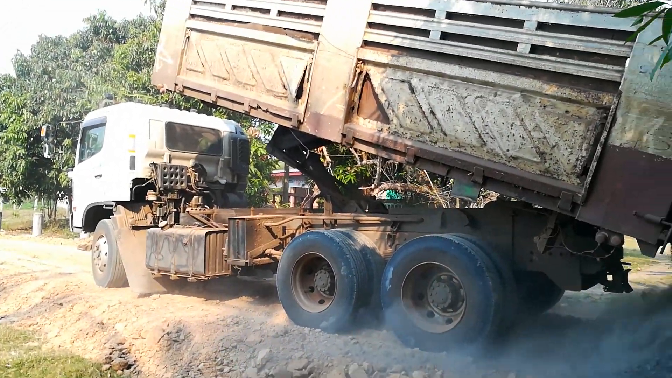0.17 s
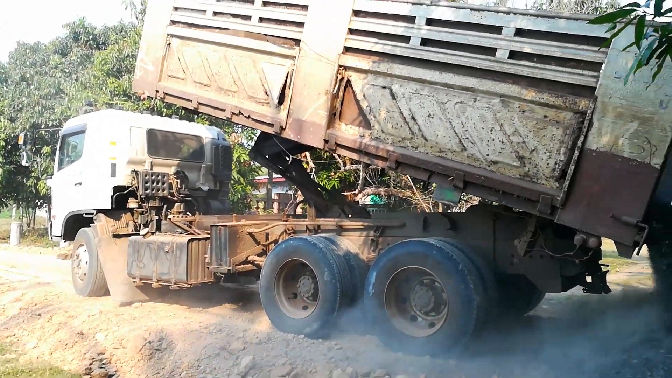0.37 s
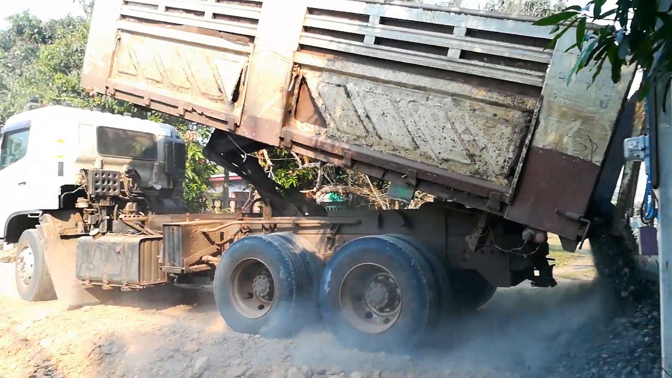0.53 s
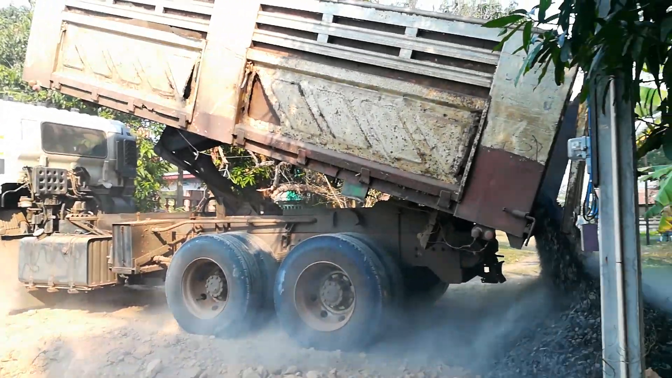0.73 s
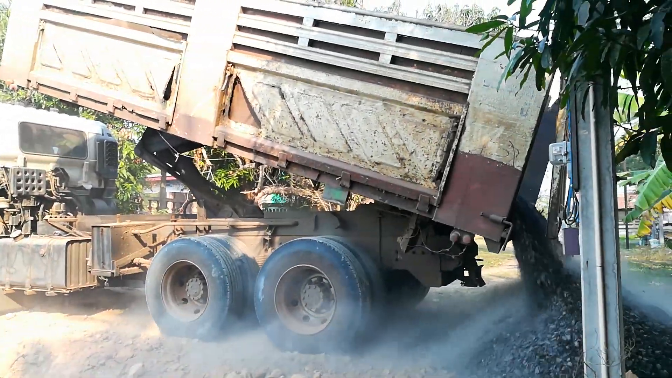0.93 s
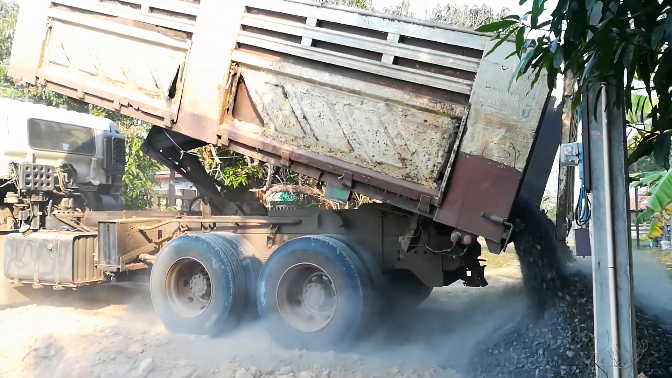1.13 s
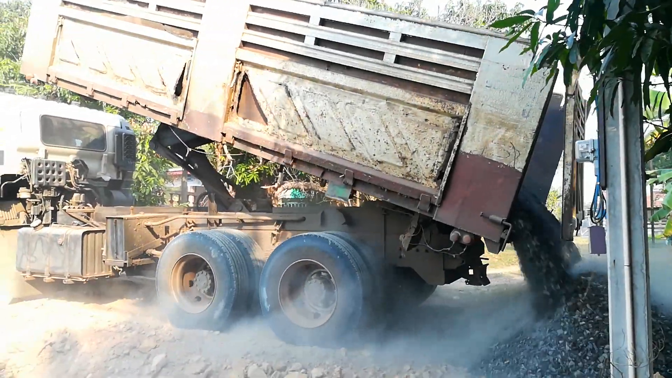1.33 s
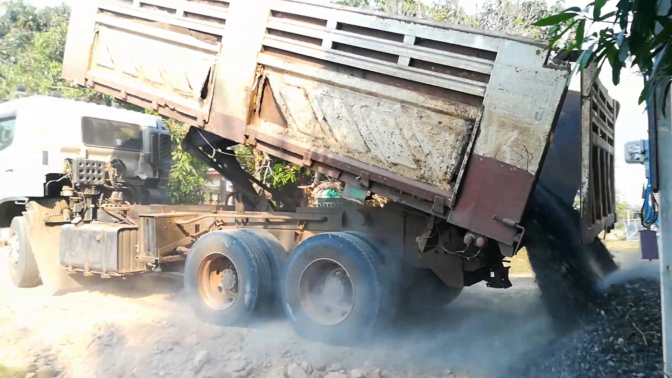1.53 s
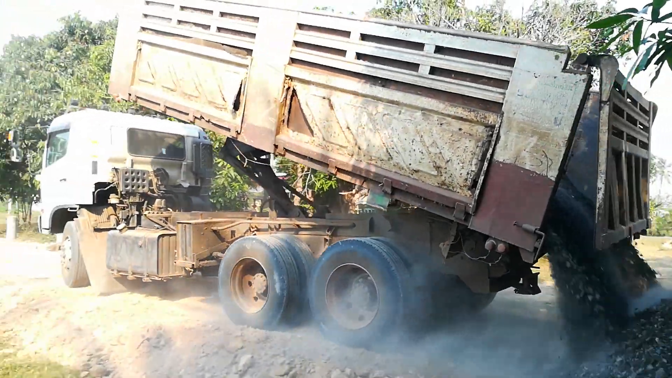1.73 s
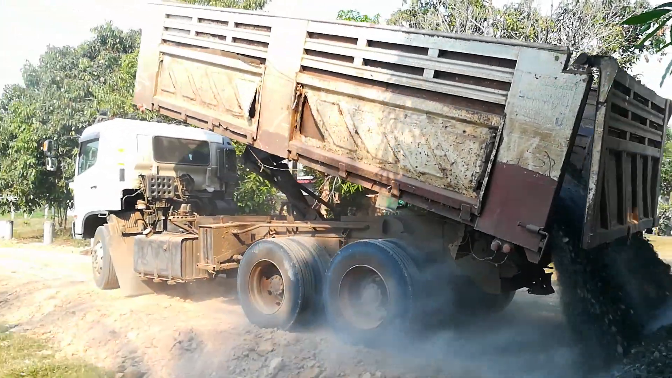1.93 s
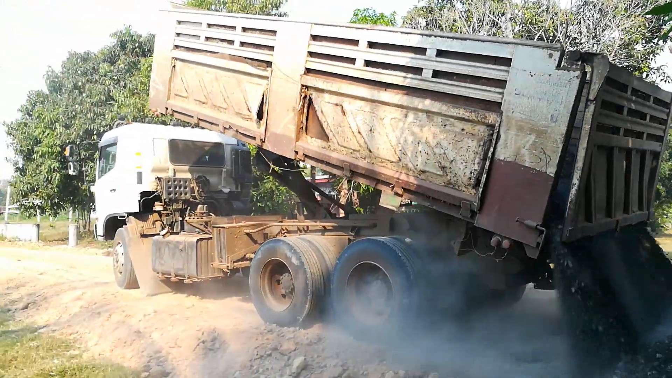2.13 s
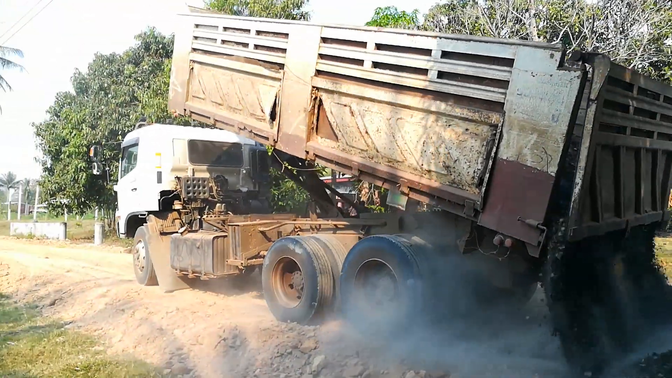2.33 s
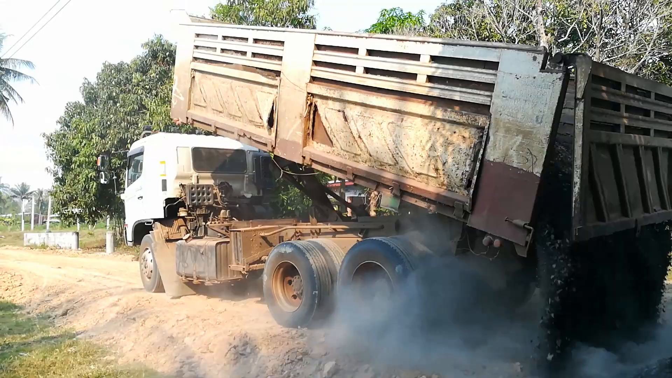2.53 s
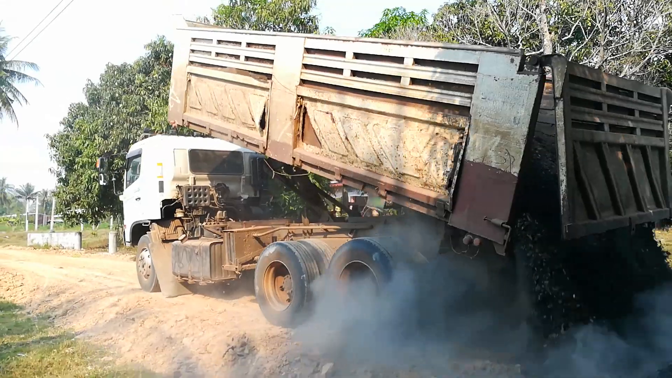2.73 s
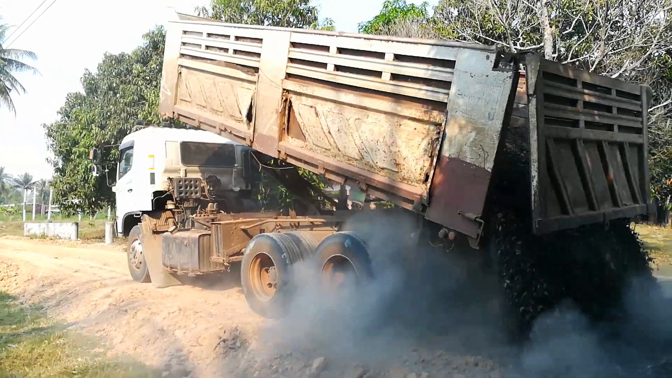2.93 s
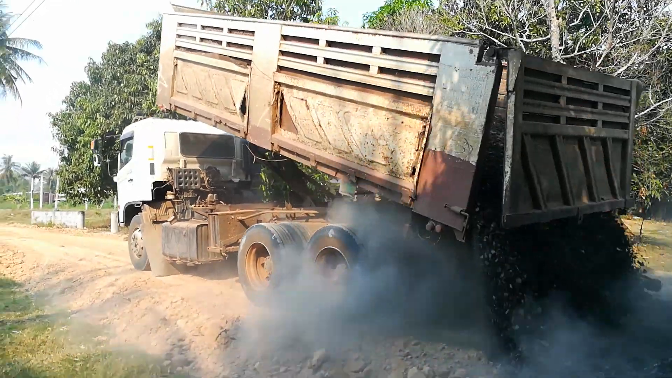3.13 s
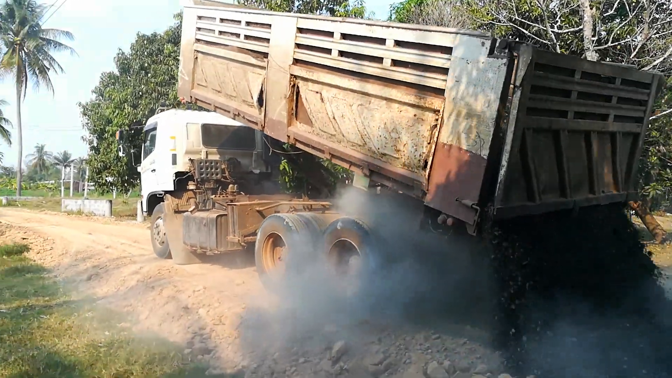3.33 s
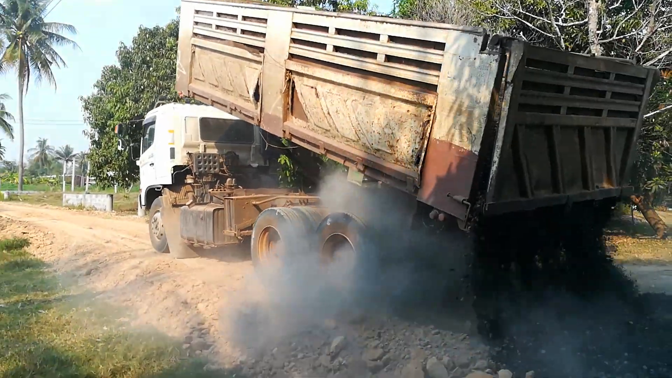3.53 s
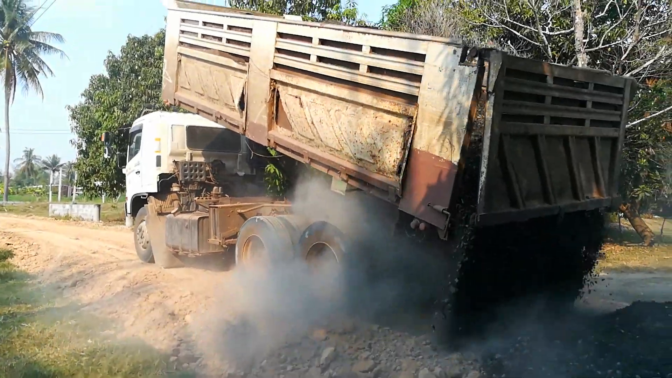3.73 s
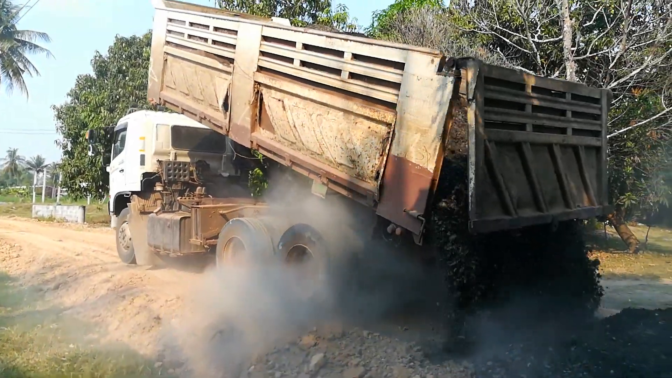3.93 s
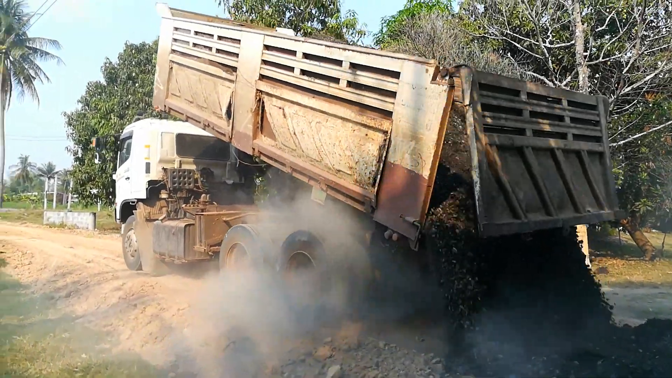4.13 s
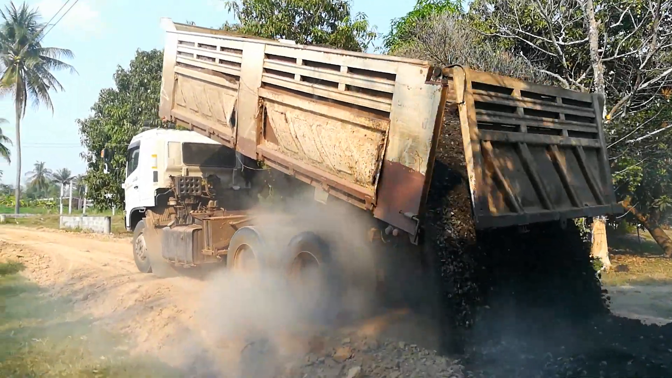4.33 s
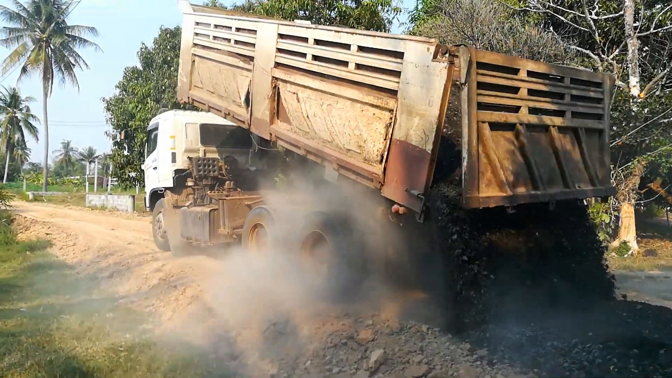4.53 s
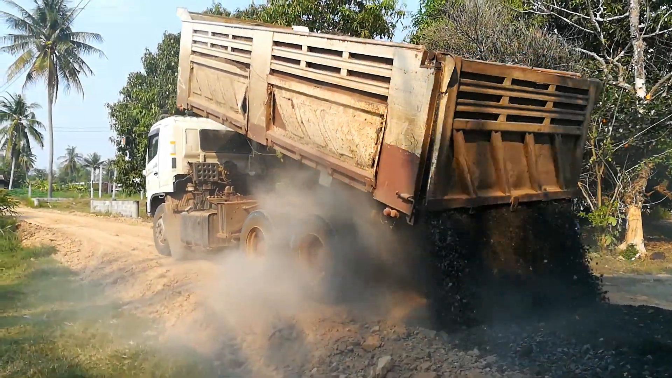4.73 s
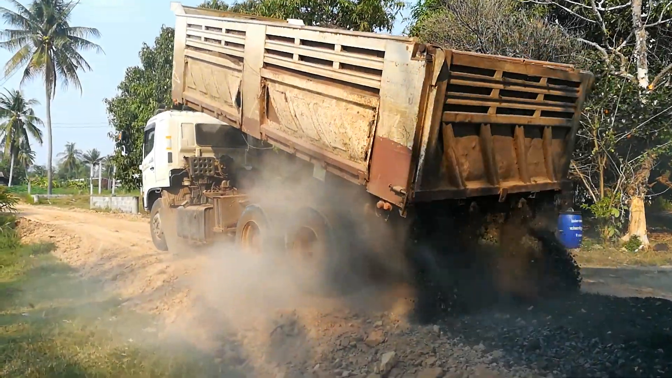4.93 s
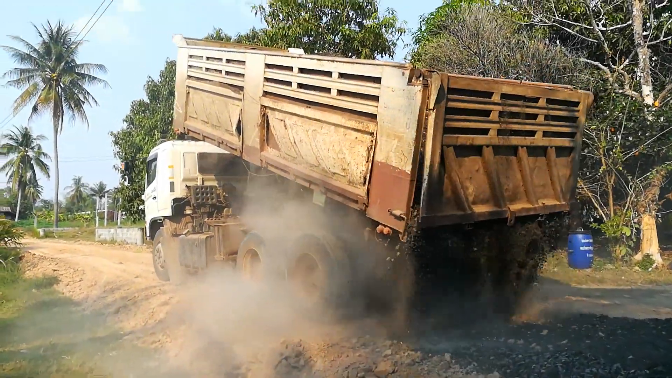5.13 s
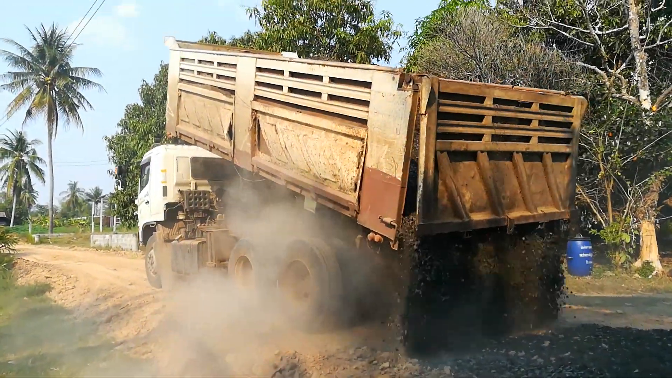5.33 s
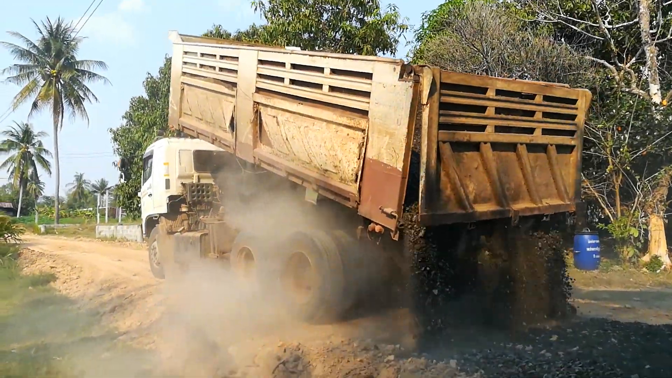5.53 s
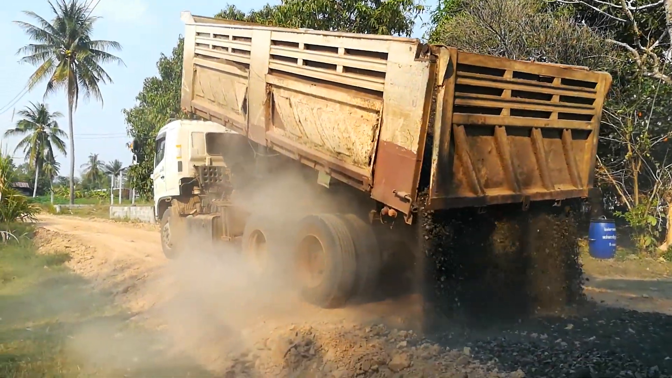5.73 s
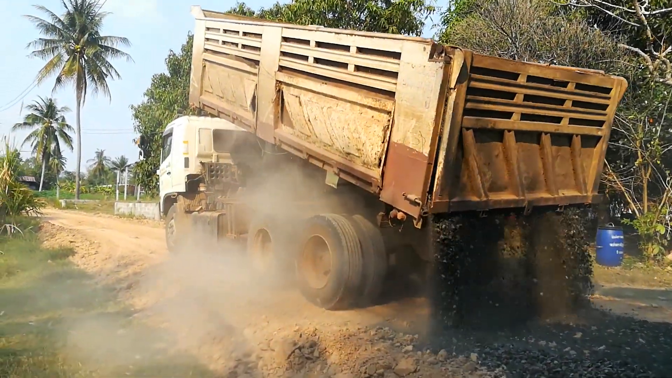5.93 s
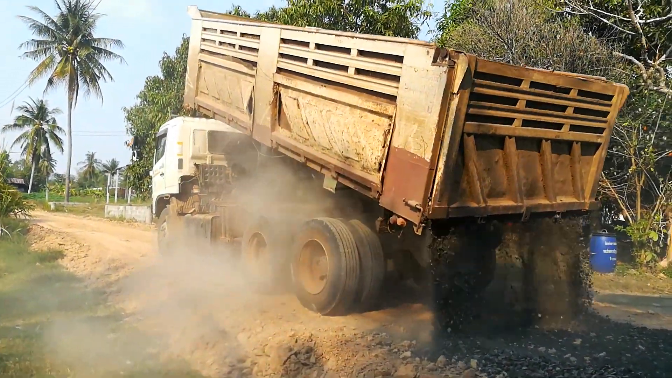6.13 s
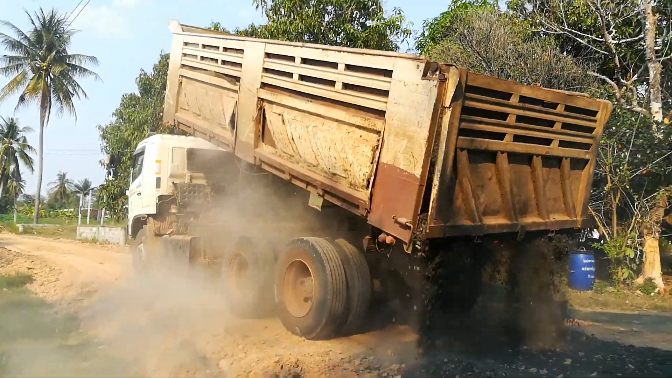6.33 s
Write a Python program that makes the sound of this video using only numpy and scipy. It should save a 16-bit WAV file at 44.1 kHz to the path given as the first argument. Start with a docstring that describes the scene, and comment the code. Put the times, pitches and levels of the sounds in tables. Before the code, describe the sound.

Outdoors, gravel hisses from a tipping truck while its diesel throbs low, rising and falling. After a brief high hinge squeal, coarse rock comes down in crunching rushes that rattle the steel bed and rumble on the ground. The loudest rush makes the bed boom. A last surge follows, with sharp stone strikes and small pings. The pouring spreads wide in stereo, with the engine in the middle.

```python
"""Coarse rock slides down a dump truck's tipped steel bed in five big surges and smaller slips. Its many small
collisions crunch and rattle the panels and it rumbles on the ground. Fine gravel hisses out under the tailgate,
single stones strike the metal and the tailgate clangs once. Behind it the diesel revs up and down, hard chips
ping, the tailgate hinge squeals once, and the tailgate swings shut with a low boom that sets the bed ringing."""
import sys
import numpy as np
from scipy import signal
from scipy.fft import rfft, irfft, next_fast_len
from scipy.io import wavfile
from scipy.ndimage import map_coordinates

SR = 44100
rng = np.random.default_rng(int(sys.argv[2]) if len(sys.argv) > 2 else 0)


def store_wav(level_fs):
    """Save 16-bit WAV to argv[1]."""
    pcm = np.round(np.clip(np.atleast_2d(level_fs), -1, 1) * 32767)
    wavfile.write(sys.argv[1], SR, pcm.T.astype(np.int16))


N = 286209
BAND_LIMIT_HZ = 15900

# rock surges: (full flow at [s], rise [s], hold [s], fall [dB/s], crunch [dB], rattle [dB], rumble [dB])
ROCK_SURGES = [(.34, .22, .19, 87, -33, -43.5, -54), (1.2, 0.66, 1, 30, -48, -50.5, -51),
               (2.08, 0.11, 0.028, 130, -25.5, -37.5, -51), (2.24, 0.051, 0.012, 69, -32.5, -41, -53),
               (2.435, .015, .005, 172, -34, -40.5, -51), (3.25, .075, 0.019, 112, -25, -32.5, -45),
               (3.463, .04, 0.0092, 64, -38, -40.5, -54), (3.745, 0.22, 0.38, 63, -57, -51, -53),
               (4.19, 0.031, .01, 200, -49, -57, -56), (4.53, 0.042, 0.024, 60, -44.5, -49, -44),
               (4.717, 0.072, 0.036, 187, -18.5, -20.5, -28.5), (4.949, .1, 0.035, 78, -36.5, -38, -41),
               (5.171, .015, 0.0052, 189, -35.5, -43, -54), (5.396, 0.22, 0.27, 36, -50, -49.5, -52.5),
               (5.915, .12, 0.071, 45, -27.5, -32, -49.5), (6.18, 0.082, 0.0095, 59, -36.5, -44.5, -52)]
# stone on stone: (frequency [Hz], level [dB])
CRUNCH_SPECTRUM = [(500, -26.5), (1500, -7.5), (2400, -4.5), (3400, 2), (5500, -0.5), (7500, -4.5),
                   (9500, -10), (12000, -19), (16000, -40)]
# stone on steel: (frequency [Hz], level [dB])
RATTLE_SPECTRUM = [(300, -27), (550, -10.5), (800, -1), (1100, -5), (1600, -1), (2050, 0.5), (2500, -6),
                   (4000, -21)]
# left-right likeness of direct sound: (frequency [Hz], coherence [0..1])
DIRECT_COHERENCE = [(60, 1), (250, 0.95), (700, 0.33), (1400, 0.96), (2500, 0.29), (5000, 0.11),
                    (15000, 0.083)]
def rock_slide():
    """Rock comes down in clumps, knocking and chinking; the bed rattles just after and fades slower."""
    sliding = flow([(*shape, db) for *shape, db, _, _ in ROCK_SURGES])
    shaking = flow([(*shape, db) for *shape, _, db, _ in ROCK_SURGES], lag_s=0.01, fall_scale=0.72)
    clumps = wobble(70)
    knocks = collisions(count=70000, scatter_db=8, decay_s=.0002, samples=40)
    chinks = collisions(count=4500, scatter_db=9, decay_s=.005, samples=560)
    crunch = wall_reflections(knocks + amp(-7.5) * chinks, t60_s=0.1, wet_db=-4)
    crunch = stereo(crunch, CRUNCH_SPECTRUM, DIRECT_COHERENCE)
    drumming = collisions(count=80000, scatter_db=8, decay_s=.00012, samples=24)
    drumming = wall_reflections(drumming, t60_s=0.18, wet_db=-6.5)
    rattle = steel_panels(stereo(drumming, RATTLE_SPECTRUM, DIRECT_COHERENCE), direct_db=-4.5)
    return sliding * amp(0.5 + 1.25 * clumps) * crunch + shaking * amp(0.17 + clumps) * rattle


def flow(pours, lag_s=0, fall_scale=1):
    """Gain of overlapping pours: each swells 15 dB over its rise time, holds, then drains."""
    t = np.arange(N) / SR - lag_s
    power = np.zeros(N)
    for full_s, rise_s, hold_s, fall_db_per_s, db in pours:
        swell_db = 15 * (np.maximum(full_s - t, 0) / rise_s) ** 2
        drain_db = fall_scale * fall_db_per_s * np.maximum(t - full_s - hold_s, 0)
        power += amp(db - np.minimum(swell_db + drain_db, 100)) ** 2
    return np.sqrt(power)


def collisions(count, scatter_db, decay_s, samples):
    """Two streams of tiny impacts, each a damped ring of random pitch and strength."""
    t = np.arange(samples, dtype=np.float32) / SR
    when, pitch, strength, stream = rng.random((count, 4)).T
    phase = np.outer(np.float32(2 * np.pi * BAND_LIMIT_HZ * pitch), t)
    rings = np.float32(amp(scatter_db * strength))[:, None] * np.sin(phase) * np.exp(-t / decay_s)
    start = (when * (N - samples)).astype(int) + N * (stream > .5)
    index = start[:, None] + np.arange(samples)
    return unit_rms(np.bincount(index.ravel(), rings.ravel(), 2 * N).reshape(2, N))


def wall_reflections(pair, t60_s, wet_db):
    """Dense echoes between the steel walls blur collisions into a rush."""
    t = np.arange(SR // 8) / SR
    tail = rng.standard_normal((2, len(t))) * amp(-60 * t / t60_s)
    echoes = unit_rms(signal.fftconvolve(pair, tail, axes=1)[:, :N])
    return unit_rms(pair + amp(wet_db) * echoes)


# bed panel resonances: (centre [Hz], width [Hz], gain [dB])
PANEL_MODES = [(907, 23, -5), (1012, 31, -2.5), (1108, 88, 6.5), (1220, 66, -1.5), (1352, 42, -2.5),
               (1523, 78, 1.5), (1934, 84, -9)]
def steel_panels(blows, direct_db):
    """Blows heard directly and through the bed's ringing panels."""
    def resonance(hz):
        return sum(amp(db) * 1j * hz * width_hz / (centre_hz ** 2 - hz ** 2 + 1j * hz * width_hz)
                   for centre_hz, width_hz, db in PANEL_MODES)
    return unit_rms(filtered(blows, lambda hz: amp(direct_db) + resonance(hz)))


# low rumble of ground and exhaust: (frequency [Hz], level [dB])
RUMBLE_SPECTRUM = [(20, -14), (60, 3), (120, 1), (190, -2.5), (240, -1), (330, 0), (450, -8.5),
                   (900, -20.5)]
def ground_rumble():
    """Each surge lands a moment later, over the steady stream hitting the ground."""
    landing = flow([(*shape, db) for *shape, _, _, db in ROCK_SURGES], lag_s=0.019, fall_scale=0.46)
    steady_db = -58.5
    return np.hypot(landing, amp(steady_db)) * stereo_noise(RUMBLE_SPECTRUM, DIRECT_COHERENCE)


# tailgate swinging shut: (time [s], relative level [dB], hardness [dB/octave re 150 Hz])
TAILGATE_BLOWS = [(4.744, -31.5, 8.5), (4.759, -28.5, -3)]
# whole-bed modes: (frequency [Hz], relative level [dB], t60 [s])
BED_MODES = [(68.7, -7, 1.0), (98, -5, 1), (115.5, -8.5, 2.3), (159, -14, .3), (224, 3, 0.24),
             (291, -17, 0.74), (340, -9, 0.16), (366, -11, 0.46), (534, -9, 0.17)]
def bed_boom():
    """The tailgate swings shut and sets the whole bed ringing in its low modes."""
    out = np.zeros(N)
    for start_s, blow_db, db_per_octave in TAILGATE_BLOWS:
        t = np.maximum(np.arange(N) / SR - start_s, 0)
        attack = 1 - np.exp(-t / .002)
        for hz, mode_db, t60_s in BED_MODES:
            level_db = blow_db + mode_db - 5 + db_per_octave * np.log2(hz / 150) - 60 * t / t60_s
            out += amp(level_db) * attack * np.sin(2 * np.pi * (hz * t + rng.random()))
    return out


# gravel gushes: (full flow at [s], rise [s], hold [s], fall [dB/s], relative level [dB])
GRAVEL_GUSHES = [(.13, 0.28, 0.23, 18, -47.5), (.9, 0.34, 1.4, 8, -52.5), (2.08, .08, .04, 80, -47),
                 (2.7, 0.29, 0.11, 14, -46), (3.84, 0.061, 0.29, 18, -48.5), (4.55, .13, 0.36, 65, -44.5),
                 (4.71, .06, 0.017, 152, -34.5), (5.38, 0.17, 0.79, 51, -43),
                 (6.4, 0.038, 0.095, 15, -49.5)]
# gushing chips: (frequency [Hz], level [dB])
HISS_SPECTRUM = [(1500, -43), (2700, -9.5), (4000, -3.5), (6000, 0), (8500, 0.5), (11000, -2.5),
                 (15800, -6)]
# steady trickle: (frequency [Hz], level [dB])
TRICKLE_SPECTRUM = [(22, -16), (38, -3), (136, -5), (319, -12.5), (480, -18.5), (600, -8), (960, -4),
                    (1330, -17.5), (1540, -8), (1880, -6), (2360, -14.5), (3200, -10.5), (5500, -7),
                    (15800, -20)]
# left-right likeness of scattered sound: (frequency [Hz], coherence [0..1])
SCATTERED_COHERENCE = [(60, .99), (250, 0.94), (640, 0.12), (1200, 1), (2500, 0.11), (15000, 0.065)]
def fine_gravel():
    """Chips and sand gush onto the heap over a steady trickle."""
    grit = collisions(count=70000, scatter_db=9, decay_s=.0002, samples=32)
    tinkle = collisions(count=3500, scatter_db=15, decay_s=.005, samples=560)
    chips = stereo(grit + amp(-8.5) * tinkle, HISS_SPECTRUM, SCATTERED_COHERENCE)
    trickle = stereo_noise(TRICKLE_SPECTRUM, SCATTERED_COHERENCE)
    gushing = flow(GRAVEL_GUSHES) * amp(7.5 + 0.79 * wobble(30))
    return gushing * chips + amp(-44 + 0.36 * wobble(8)) * trickle


# hits on steel, stones and at 2.42 s the tailgate: (time [s], relative level [dB], clank offset [dB])
STEEL_HITS = [(0.7544, -30.5, -19), (1.704, -28, -11), (1.8153, -27.5, -28), (1.9939, -33, -20),
              (2.3238, -24, -28), (2.3575, -19, -21), (2.4213, -13, -27.5), (3.882, -30, -24.5),
              (4.38, -33, -21), (5.164, -21.5, -14), (5.7713, -21.5, -19), (5.8202, -17.5, -17),
              (5.969, -18, -10), (6.1245, -26, -3.5), (6.1808, -17, -26), (6.3066, -27, -2),
              (6.3698, -29.5, -3)]
# bright part of a hit: (frequency [Hz], level [dB])
CLINK_SPECTRUM = [(600, -48), (1800, -2.5), (3000, -11), (5500, -1), (7600, 2), (9800, -9.5), (12000, -18),
                  (16000, -38)]
def steel_strikes():
    """A hit on steel: a bright crack, a spray of chips and a lower clank."""
    crack_t60_s, spray_t60_s, clank_t60_s = 0.042, 0.16, 0.14
    clink_gain, clank_gain = np.zeros((2, N + SR))
    t = np.arange(SR // 4) / SR
    clink_decay = amp(-60 * t / crack_t60_s) + amp(-7.5 - 60 * t / spray_t60_s)
    for start_s, db, clank_db in STEEL_HITS:
        start = round(start_s * SR)
        blow = amp(db) * (1 - np.exp(-t / .0007))
        clink_gain[start:start + len(t)] += blow * clink_decay
        clank_gain[start:start + len(t)] += blow * amp(clank_db - 60 * t / clank_t60_s)
    clink = stereo_noise(CLINK_SPECTRUM, DIRECT_COHERENCE)
    clank = steel_panels(stereo_noise(RATTLE_SPECTRUM, DIRECT_COHERENCE), direct_db=-5)
    return amp(-7.5) * clink_gain[:N] * clink + amp(-1.5) * clank_gain[:N] * clank


# engine speed: (time [s], firing rate [Hz])
FIRING_RATE = [(0, 24.98), (.45, 35.17), (.7, 36.9), (1, 33.95), (1.34, 30.25), (1.7, 34.33), (2.02, 39.86),
               (2.28, 41.57), (2.73, 31.32), (3.12, 26), (3.45, 41.88), (3.65, 46.5), (3.87, 42.66),
               (4.17, 37.1), (4.5, 34.34), (5.08, 37.9), (5.45, 25.46), (5.8, 22.74), (6.49, 24.7)]
# engine pull: (time [s], throb level [dB])
THROTTLE_LEVEL = [(0, -52), (.42, -45), (1, -42.5), (1.5, -45), (2.3, -44), (2.52, -53), (2.72, -67),
                  (2.95, -52), (3.2, -59), (3.38, -43), (3.88, -40.5), (4.12, -48), (4.32, -56), (4.6, -62),
                  (4.97, -51), (5.3, -56), (5.95, -46), (6.49, -47.5)]
# exhaust pipe response for orders 1 and 2: (frequency [Hz], gain [dB])
PIPE_RESPONSE = [(23, -14), (27, -6), (31, -2), (36, -0.5), (47, 0), (54, -3), (62, -11), (70, -14),
                 (82, -11), (93, -5.5)]
# upper exhaust orders at a 35 Hz firing rate: (order, level [dB])
EXHAUST_ORDERS = [(3, -60), (4, -62), (5, -65), (6, -71.5), (7, -73), (8, -78), (9, -78)]
def diesel():
    """Firings throb through the pipe with the throttle; overtones and puffs grow with the revs."""
    firing_hz = over_time(FIRING_RATE)
    throttle_db = over_time(THROTTLE_LEVEL)
    phase = 2 * np.pi * np.cumsum(firing_hz * (1 + 0.0055 * wobble(25.08))) / SR
    throb = sum(amp(throttle_db + at_hz(PIPE_RESPONSE, order * firing_hz) + .6 * wobble(23))
                * np.cos(order * phase) for order in (1, 2))
    overtones = sum(amp(db + 1.5 * wobble(19)) * np.cos(round(order) * phase + rng.normal(0, 0.43))
                    for order, db in EXHAUST_ORDERS)
    gas = filtered(rng.standard_normal(N), lambda hz: amp(at_hz(RUMBLE_SPECTRUM, hz)))
    puffs = unit_rms(np.exp(1.2 * np.cos(phase)) * gas)
    rev_gain = amp(13.6 * np.log2(firing_hz / 35))
    return np.sqrt(2) * throb + rev_gain * (np.sqrt(2) * overtones + amp(-60.5) * puffs)


# hard chips ringing: (time [s], frequency [Hz], level [dB])
CHIP_RINGS = [(1.880, 14000, -40), (2.530, 15350, -44), (3.079, 8960, -37), (3.390, 14630, -38),
              (3.835, 15290, -36), (4.383, 14540, -36), (5.772, 11070, -28.5), (5.805, 15460, -29),
              (5.820, 3650, -25), (6.385, 14360, -41)]
def chip_pings(t60_s=0.13):
    """A hard chip rings on one high mode, with its own phase in each channel."""
    out = np.zeros((2, N))
    t = np.arange(SR // 16) / SR
    attack = 1 - np.exp(-t / .001)
    for start_s, hz, db in CHIP_RINGS:
        start = round(start_s * SR)
        ring = np.sin(2 * np.pi * (hz * t + rng.random((2, 1))))
        out[:, start:start + len(t)] += amp(db - 60 * t / t60_s) * attack * ring
    return out


# tailgate swinging open: (time [s], squeal level [dB])
SQUEAL_LEVEL = [(1.2, -80), (1.62, -60), (1.73, -43), (1.86, -45), (1.97, -54), (2.05, -90)]
def hinge_squeal():
    """Dry steel rubs in the tailgate hinge with a thin, unsteady tone."""
    squeal_hz = 8780 * (1 + 0.00495 * wobble(250))
    squeal_db = over_time(SQUEAL_LEVEL) + 3.5 * wobble(49.7)
    return amp(squeal_db) * np.sin(2 * np.pi * np.cumsum(squeal_hz) / SR)


def amp(db):
    """Decibels to gain."""
    return 10 ** (np.asarray(db) / 20)


def unit_rms(x):
    """Scale to rms 1."""
    return x / np.sqrt(np.mean(x ** 2) + 1e-20)


def at_hz(points, hz):
    """Read (frequency, value) points on a log axis."""
    knots_hz, values = np.transpose(points)
    return np.interp(np.log(hz + 1), np.log(knots_hz + 1), values)


def over_time(points):
    """Read (time, value) points at every sample."""
    knots_s, values = np.transpose(points)
    return np.interp(np.arange(N) / SR, knots_s, values)


def wobble(rate_hz):
    """Smooth random curve, rate_hz knots a second."""
    knots = rng.standard_normal(int(N * rate_hz / SR) + 4)
    coarse = np.arange(0, N + 16, 16)
    return np.interp(np.arange(N), coarse, map_coordinates(knots, [coarse * rate_hz / SR]))


def filtered(x, response):
    """Apply a frequency response."""
    size = next_fast_len(N + SR // 2)
    hz = np.fft.rfftfreq(size, 1 / SR)
    return irfft(rfft(x, size) * response(hz), size)[..., :N]


def stereo(pair, spectrum, coherence):
    """Mix two unrelated signals as mid and side into coloured stereo of rms 1."""
    def mid_side_gains(hz):
        angle = np.arccos(np.clip(at_hz(coherence, hz), -1, 1)) / 2
        return amp(at_hz(spectrum, hz)) * [np.cos(angle), np.sin(angle)]
    mid, side = filtered(pair, mid_side_gains)
    return unit_rms(np.array([mid + side, mid - side]))


def stereo_noise(spectrum, coherence):
    """Coloured stereo noise of rms 1."""
    return stereo(rng.standard_normal((2, N)), spectrum, coherence)


def scene():
    """The load pours off the truck while the engine runs."""
    load = rock_slide() + ground_rumble() + bed_boom() + fine_gravel() + steel_strikes()
    return load + diesel() + chip_pings() + hinge_squeal()


# microphone port colour: (frequency [Hz], left minus right [dB])
PORT_BALANCE = [(200, 0.5), (380, 0), (520, 1.5), (700, 1), (1000, -2), (1400, 2), (2300, 1.5), (3200, -2),
                (4400, -4.5), (8000, -7.5), (15000, -10.5)]
def record(dry):
    """Two band-limited microphone ports; the left is duller and slightly later."""
    sides, left_lag_s = np.array([[.5], [-.5]]), .00015
    def ports(hz):
        delay = np.exp(-2j * np.pi * hz * sides * left_lag_s)
        return amp(sides * at_hz(PORT_BALANCE, hz)) * delay * (hz < BAND_LIMIT_HZ)
    return filtered(dry, ports)


dry = scene()
out = record(dry)
store_wav(out)
```